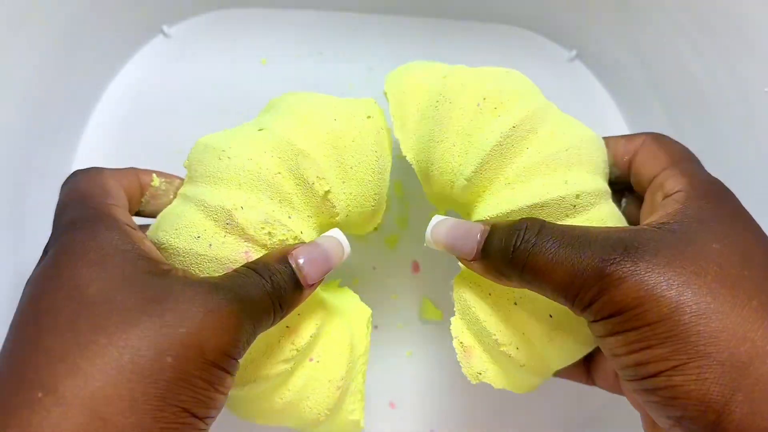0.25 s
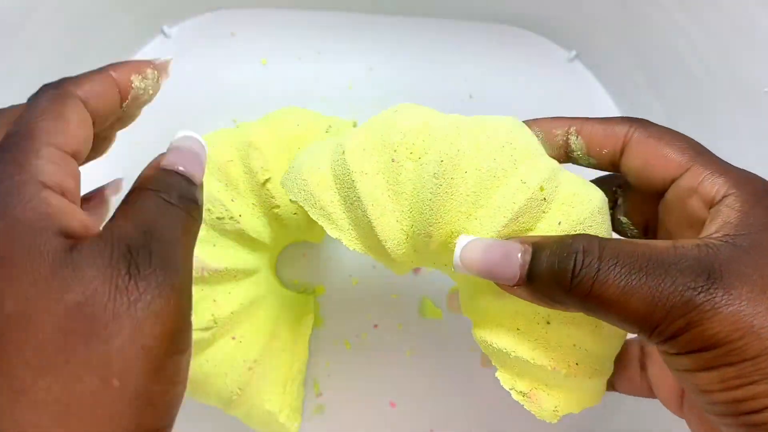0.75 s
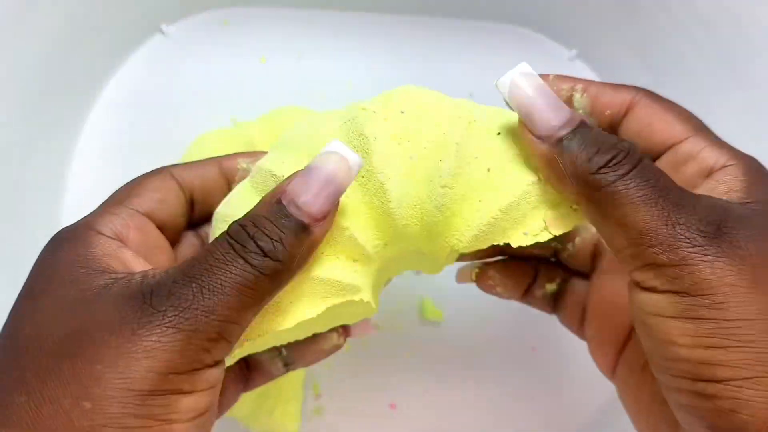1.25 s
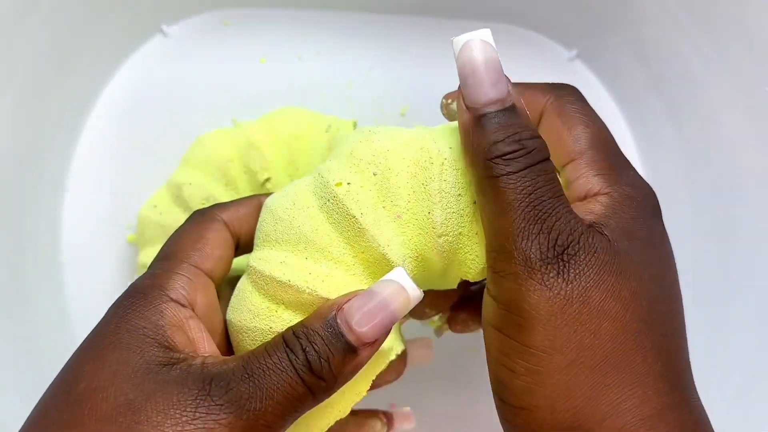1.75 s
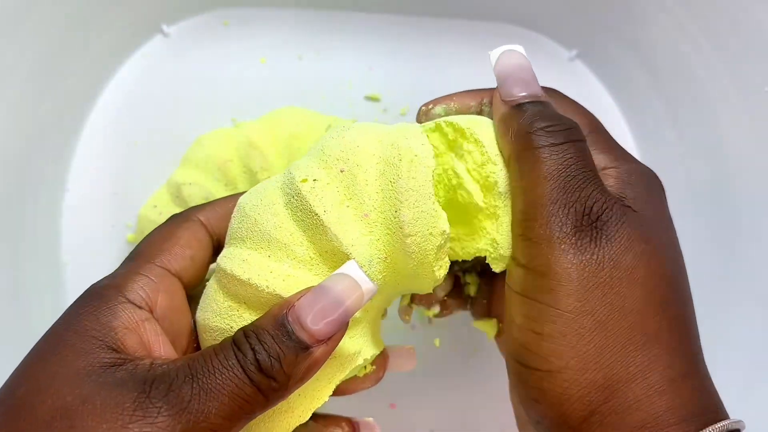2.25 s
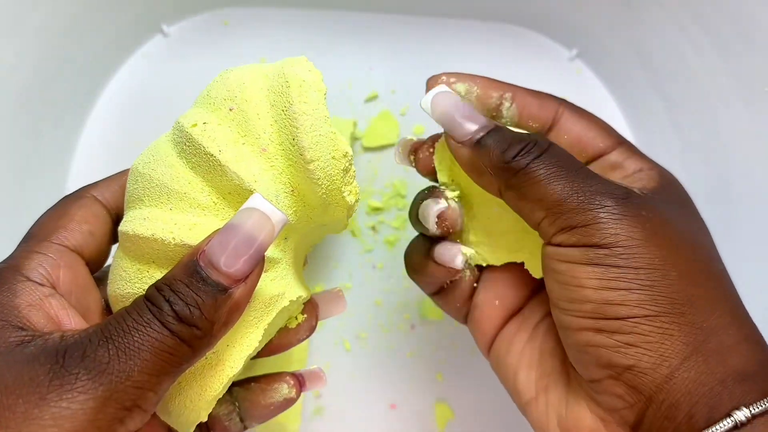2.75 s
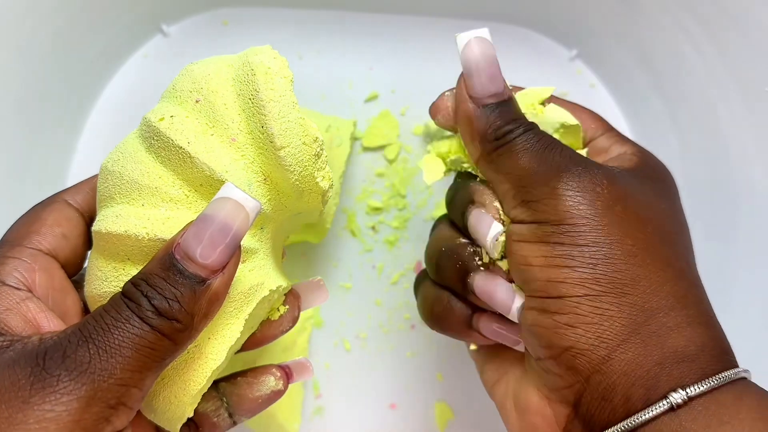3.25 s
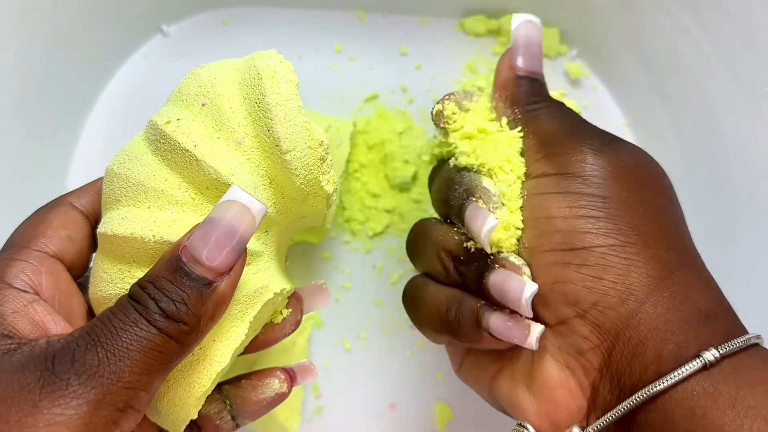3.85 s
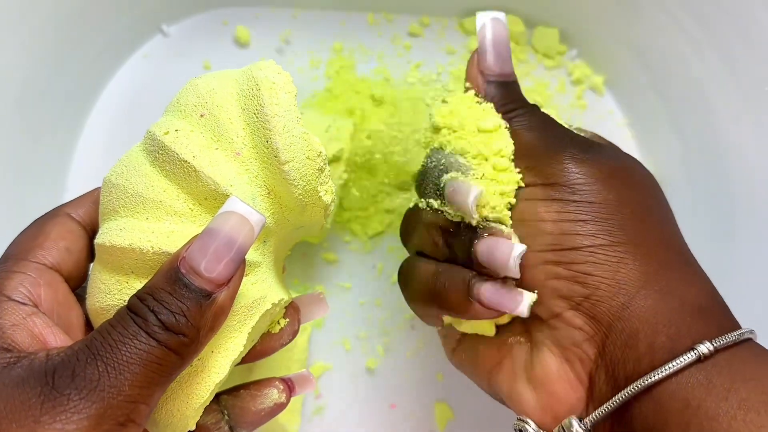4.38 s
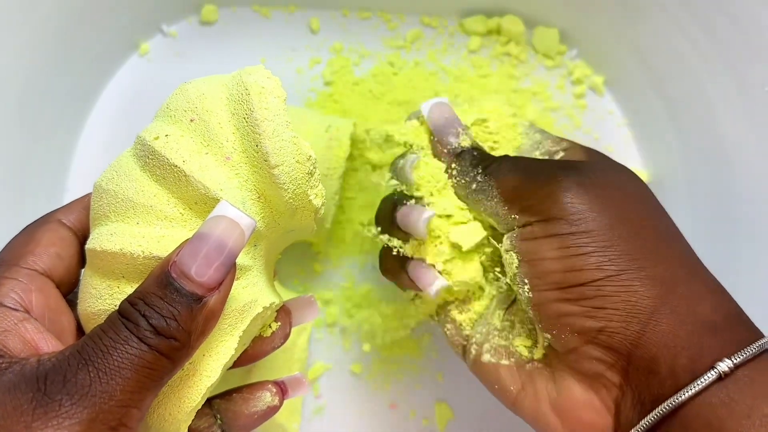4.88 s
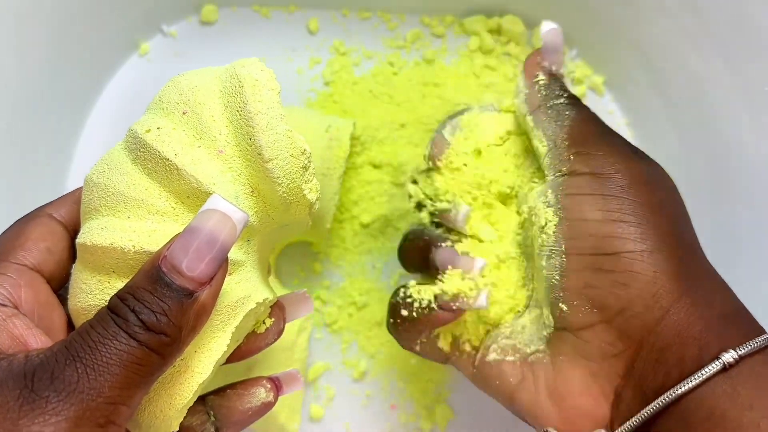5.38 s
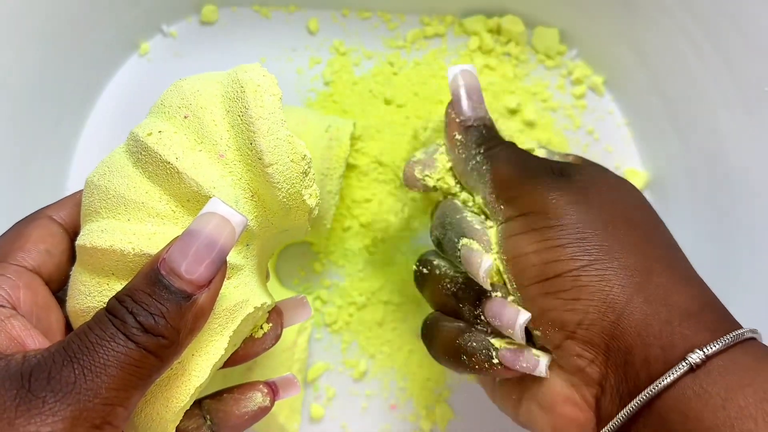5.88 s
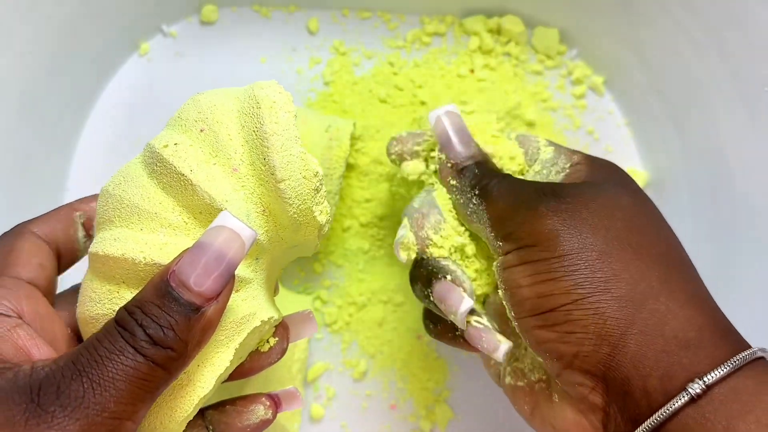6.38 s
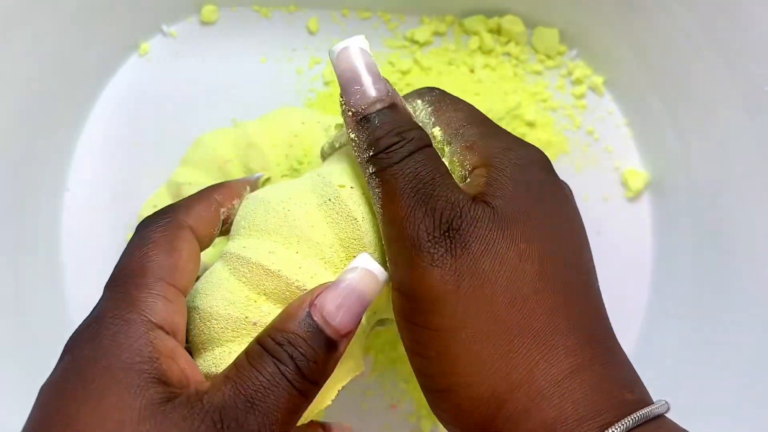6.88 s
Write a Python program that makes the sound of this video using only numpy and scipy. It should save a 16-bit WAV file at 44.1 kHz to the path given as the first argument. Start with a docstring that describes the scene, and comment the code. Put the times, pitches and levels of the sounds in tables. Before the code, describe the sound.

Close, crisp snaps and gritty crunching as a hand squeezes a chalk block to powder, crumbs sifting into a hollow plastic basin.

```python
"""A block of dry chalk is gripped, snapped and crushed by hand over a plastic basin, close under a small
microphone. Snaps and falling crumbs ring the hollow of the basin, skin hisses over the chalk, nails tick,
and knocks boom in the basin floor. Behind the hands the room rumbles. The recorder ducks after peaks
and clips the loudest."""
import sys
import numpy as np
from scipy import signal
from scipy.io import wavfile
from scipy.ndimage import uniform_filter1d

SR = 44100
rng = np.random.default_rng(int(sys.argv[2]) if len(sys.argv) > 2 else 0)


def put_to_file(sound):
    """Save the sound as 16-bit audio at rate SR, in the file named by the first command-line argument."""
    columns = np.atleast_2d(sound).T  # one column per channel
    safe = np.clip(columns, -1, 1)
    whole_steps = np.round(safe * 32767)
    wavfile.write(sys.argv[1], SR, whole_steps.astype(np.int16))


N = 314430


def gain_of(db):
    """Decibels to an amplitude factor."""
    return 10 ** (np.asarray(db) / 20)


def unit_rms(x):
    """Scales to rms 1."""
    return x / np.sqrt(np.mean(x ** 2) + 1e-20)


def at_hz(points, hz):
    """Reads a (frequency, value) table along a log frequency axis."""
    f, value = np.transpose(points)
    return np.interp(np.log(hz + 1), np.log(f + 1), value)


def level(rows, column=1):
    """One dB column of a time table as a gain, sample by sample."""
    rows = np.array(rows)
    return gain_of(np.interp(np.arange(N) / SR, rows[:, 0], rows[:, column]))


def resonances(rows):
    """A (frequency, dB) spectrum made of resonance peaks."""
    hz = np.geomspace(600, 12000, num=400)
    peaks = sum(gain_of(db) / (1 + ((hz - f) / (width / 2)) ** 2) for f, width, db in rows)
    return list(zip(hz, 20 * np.log10(peaks)))


def add(mix, start_s, sound):
    """Lays a sound into the mix at a time."""
    part = mix[..., max(round(start_s * SR), 0):][..., :sound.shape[-1]]
    part += sound[..., :part.shape[-1]]


def panned(sound, pan_db):
    """Leans a sound left or right."""
    return sound * gain_of([[pan_db / 2], [-pan_db / 2]])


# Left-right likeness of the noise; the opposed top treble is an audio coder effect:
# (frequency [Hz], left-right correlation)
STEREO_LIKENESS = [(60, 1), (300, 0.82), (700, -0.12), (2000, 1), (5000, 0.47), (8000, 1), (11000, -1.017),
                   (15000, -0.92)]


def noise(spectrum, size, patchy_db, flicker_db):
    """Stereo noise at rms 1, with drifting patches and a flicker shared by all bands."""
    hop = size // 2
    frames, hz = N // hop + 3, np.fft.rfftfreq(size, 1 / SR)
    a, b, c, d, patches = rng.standard_normal((frames, len(hz), 5), np.float32).T
    patches = unit_rms(uniform_filter1d(uniform_filter1d(patches, size=5, axis=0), size=6, axis=1))
    flicker = unit_rms(uniform_filter1d(rng.standard_normal(frames), size=2))
    width = np.sqrt((1 - np.clip(at_hz(STEREO_LIKENESS, hz), -1, 1)) / 2)[:, None]
    mid, side = np.sqrt(1 - width ** 2) * (a + 1j * b), width * (c + 1j * d)
    bands = np.array([mid + side, mid - side])
    bands *= gain_of(at_hz(spectrum, hz)[:, None] + patchy_db * patches + flicker_db * flicker)
    return unit_rms(signal.istft(bands, window="cosine", nperseg=size, noverlap=hop)[1][:, :N])


# The room behind the basin: (time [s], level [dB])
ROOM_LEVEL = [(0, -34), (.3, -22), (1.03, -24.5), (1.1, -36), (1.5, -23), (2.3, -29.5), (2.9, -25.5),
              (3.3, -33.5), (3.8, -26), (4.45, -28.5), (4.8, -33.5), (5.1, -24.5), (6, -22), (7, -22.5)]
# Its rumble: (frequency [Hz], relative level [dB])
ROOM_SPECTRUM = [(15, -43), (25, -22), (41, -1.5), (65, 3.5), (97, -2.5), (132, 3.5), (152, -17), (183, -7),
                 (274, -31.5), (650, -30), (1100, -120)]


def room_rumble():
    """Low room noise swells and sinks in the background."""
    return level(ROOM_LEVEL) * noise(ROOM_SPECTRUM, size=4096, patchy_db=1, flicker_db=0)


# Fingers sliding steadily, close under the microphone: (time [s], level [dB])
SLIDING = [(0.0, -33), (0.4, -23.5), (0.71, -35.5), (.84, -34), (1.45, -27), (1.7, -34.5), (1.93, -35),
           (2.22, -34.5), (2.28, -27), (2.38, -35.5), (2.47, -30.5), (2.9, -31.5), (3.45, -36.5),
           (4.0, -30.5), (4.1, -25), (4.25, -33.5), (4.4, -29.5), (4.87, -36.5), (5.12, -29.5), (6.23, -33),
           (6.51, -25), (6.76, -32), (7.13, -33.5)]
# Single strokes of a finger or of chalk on chalk: (start [s], end [s], hiss [dB], rasp [dB])
STROKES = [(0.144, 0.289, -24.5, -37.5), (0.3, 0.39, -20, -19.5), (0.446, 0.558, -21, -24.5),
           (0.865, 0.905, -23.5, -24.5), (0.87, 1.41, -46, -40), (1.154, 1.222, -64, -30.5),
           (1.381, 1.508, -16, -34), (1.516, 1.618, -17.5, -29), (2.57, 2.636, -26.5, -37),
           (6.535, 6.667, -36, -41), (6.803, 6.861, -28, -46)]
# (frequency [Hz], relative level [dB])
HISS_SPECTRUM = [(1500, -65), (2470, -11.5), (2930, -23.5), (3540, -12.5), (4150, -16.5), (5330, -12),
                 (7200, -8.5), (7700, -5.5), (8200, -9.5), (10200, -7), (11400, -10), (11800, -80),
                 (12300, -76), (15200, -3.5), (16300, -68)]
# Hollows between ridges: (frequency [Hz], width [Hz], relative level [dB])
RASP_PEAKS = [(2440, 110, -1), (3600, 130, -2), (1500, 2000, -18)]
# Singing of a hard stroke: (frequency [Hz], width [Hz], relative level [dB])
SCRAPE_PEAKS = [(5330, 200, 0), (5900, 250, -5), (6300, 250, -6), (6800, 400, -5)]


def rubbing():
    """Skin hisses over chalk; strokes rasp between the ridges, and hard ones sing."""
    hard_stroke_db = -22  # the singing dies away quickly below this hiss level
    scrape = noise(resonances(SCRAPE_PEAKS), size=1024, patchy_db=2.5, flicker_db=2)
    rasp = noise(resonances(RASP_PEAKS), size=1024, patchy_db=3.5, flicker_db=3)
    hiss = noise(HISS_SPECTRUM, size=512, patchy_db=3, flicker_db=2.5)
    drive = np.zeros((3, N))
    for start, end, hiss_db, rasp_db in STROKES:
        scrape_db = hiss_db - 2 - 3 * max(hard_stroke_db - hiss_db, 0)
        swell = signal.windows.tukey(round((end - start) * SR), .7)
        add(drive, start, gain_of([[hiss_db], [rasp_db], [scrape_db]]) * swell)
    return (level(SLIDING) + drive[0]) * hiss + drive[1] * rasp + drive[2] * scrape


LEAD_S = .005  # a faint swell, like pre-echo, leads into each crack
# Modes of the basin's hollow and the chalk lumps: (frequency [Hz], relative level [dB], t60 [s])
HOLLOW_MODES = [(800, -11, .03), (955, 0, .07), (1130, -11, .03), (1430, -6, .022), (1900, -9, .012),
                (2540, -7, .011), (3100, -9, .009), (3800, -12, .008)]


def hollow_ring(draw, centre_hz, t):
    """A break rings the hollow, tilted up if it is bright: it builds, rings briefly and is smothered."""
    hz, db, t60 = np.transpose(HOLLOW_MODES)[:, :, None]
    detune, phase, spread = draw.reshape(3, -1, 1)
    tilt_db = 12 * np.log2(centre_hz / 1000) * np.log2(hz / 950)
    dull_db = 10 * np.maximum(np.log2(hz / (1.5 * centre_hz)), 0)
    after = np.maximum(t - LEAD_S, 0)
    decay = gain_of(db + tilt_db - dull_db + 4.42 * spread - 60 * after / t60)
    modes = decay * np.sin(2 * np.pi * hz * (1 + .055 * detune) * t + 2 * phase)
    swell = .18 * np.exp(-np.maximum(LEAD_S - t, 0) / .002)
    attack = np.exp(-np.maximum(LEAD_S + .0005 - t, 0) / .0004)
    smother = .04 + np.exp(-(after / .0045) ** 3)
    ring = modes.sum(0) * np.maximum(swell, attack) * smother * np.minimum(t / .00033, 1)
    return ring / abs(ring).max()


# The crush, just above the basin: (time [s], crumbling level [dB], fist grit level [dB])
CRUSH = [(0, -37.5, -57), (.3, -54, -43), (.42, -36, -22), (.52, -24.5, -15.5), (.6, -25, -50),
         (.75, -30, -54), (1, -51.5, -48.5), (2.1, -38, -47.5), (2.45, -33.5, -33.5), (2.94, -43.5, -36),
         (3.3, -29, -36), (4.1, -28, -34), (4.96, -28, -33), (5.5, -32.5, -32), (6.05, -41.5, -39),
         (6.39, -43, -24), (6.6, -26.5, -50.5), (6.8, -40.5, -59), (7.13, -40, -37.5)]
# Sifting powder: (frequency [Hz], relative level [dB])
POWDER_SPECTRUM = [(400, -55), (600, -14), (950, -2.5), (1500, -8.5), (2200, -18.5), (4000, -51)]


def crumbling():
    """Small grains break, more of them the harder the fist squeezes, over sifting powder."""
    full_rate_per_s, full_grit_db, kinds = 500, -36, 10
    busy = np.clip(level(CRUSH, column=2) / gain_of(full_grit_db), .02, 1)
    sizes = gain_of(4.6 * np.minimum(rng.exponential(1, N), 4))
    breaks = sizes * (rng.random(N) < full_rate_per_s * busy / SR)
    kind = rng.integers(0, kinds, N)
    grains, t = np.zeros((2, N)), np.arange(1500) / SR
    for k, draw in enumerate(rng.standard_normal((kinds, 3 * len(HOLLOW_MODES) + 2))):
        ring = hollow_ring(draw[2:], 1150 * 2 ** (.65 * draw[0]), t)
        grains += panned(signal.oaconvolve(breaks * (kind == k), ring)[:N], pan_db=2.7 * draw[1])
    powder = noise(POWDER_SPECTRUM, size=512, patchy_db=2.5, flicker_db=3.5)
    return level(CRUSH) * (.85 * np.sqrt(busy) * unit_rms(grains) + (1 - .45 * busy) * powder)


# Hollows of the closed hand: (frequency [Hz], width [Hz], relative level [dB])
FIST_PEAKS = [(1590, 220, -3), (2200, 220, 0), (2720, 260, -3), (3400, 400, -7), (2300, 2500, -10)]


def fist_grit():
    """Grit crunches inside the fist, each grain giving way in a few milliseconds."""
    grains_per_s = 200
    grit = noise(resonances(FIST_PEAKS), size=1024, patchy_db=3.5, flicker_db=3.5)
    grains = rng.exponential(1, N) ** 2 * (rng.random(N) < grains_per_s / SR)
    crunch = unit_rms(signal.oaconvolve(grains, np.exp(-np.arange(400) / 70))[:N])
    return level(CRUSH, column=2) * grit * (.8 + .2 * crunch)


# The basin's hollow drone, heard from above: (frequency [Hz], relative level [dB])
DRONE_SPECTRUM = [(120, -8), (200, -3.5), (310, 0), (450, -4.5), (700, -5), (1200, -61)]


def basin_drone():
    """The basin drones as the crush shakes it, and puffs after each knock."""
    t = np.arange(SR) / SR
    shake = gain_of(-29) * (level(CRUSH) / gain_of(-27)) ** .85
    for start, db, _, t60 in KNOCKS:
        puff = gain_of(db - 13 - 60 * t / (t60 + .24))
        add(shake, start, puff * (1 - np.exp(-t / .000056)))
    return shake * noise(DRONE_SPECTRUM, size=1024, patchy_db=2.5, flicker_db=3.5)


# Nails and grit, close to the microphone: (time [s], level [dB])
TICKS = [(0.324, -4), (0.476, -6.5), (0.876, -13), (1.054, -10.5), (1.6273, -10.5), (2.0081, -3.5),
         (2.154, -13.5), (2.1886, -17), (2.319, -10.5), (2.396, -17), (2.5804, -10), (2.707, -8),
         (2.831, -18), (2.895, -9.5), (2.935, -14), (4.044, -12), (4.055, -11), (4.28, -8.5),
         (4.319, -11.5), (4.55, -12.5), (4.8205, -11), (4.85, -13.5), (5.432, -9.5), (6.543, -9),
         (6.8658, -10), (7.041, -5)]
# Bright noise of ticks and splinters: (frequency [Hz], relative level [dB])
TICK_SPECTRUM = [(1200, -13), (3000, -4), (8000, 1.5), (10500, -2), (12000, -12), (16000, -11)]
TICK_T60_S = .022


def ticks():
    """Nails and grit tick without ringing."""
    bursts, t = np.zeros(N), np.arange(2600) / SR
    attack = 1 - np.exp(-(t / .0004) ** 2)
    for start, db in TICKS:
        add(bursts, start, attack * gain_of(db - 60 * t / TICK_T60_S))
    return bursts * noise(TICK_SPECTRUM, size=256, patchy_db=1.5, flicker_db=0)


# Cracks in the chalk, over the basin: (time [s], relative level [dB], centre [Hz])
SNAPS = [(0.3272, -0.5, 1180), (0.3778, 1, 1130), (0.403, -3.5, 1460), (0.4725, -9.5, 1330),
         (0.4817, -1.5, 1310), (0.535, 2, 1100), (0.541, 0.5, 1010), (0.5807, -9, 1250), (0.592, -3.5, 845),
         (0.631, -14, 795), (2.012, -10, 1770), (2.1729, -3.5, 1640), (2.185, -6, 1480), (2.19, 5, 1300),
         (2.3213, -13.5, 1530), (2.3538, 1.5, 1010), (2.4095, -2.5, 1560), (2.462, -9.5, 1080),
         (2.4911, 1.5, 1950), (2.5055, -1.5, 1460), (2.7096, -8.5, 1310), (2.8927, -6, 1230),
         (2.933, -12.5, 1740), (3.05, -9, 2080), (3.103, 0.5, 1750), (3.143, -2.5, 1400), (3.21, 1, 1400),
         (3.2592, -7, 1920), (3.2906, -4.5, 850), (3.3403, 2.5, 980), (3.383, -4.5, 1110),
         (3.391, -2, 1600), (3.4734, -10, 1130), (3.49, -5.5, 1160), (3.517, 3.5, 1350),
         (3.5891, -2.5, 830), (3.5956, -5, 820), (3.6607, -9.5, 880), (3.681, -15, 900),
         (3.7221, -6.5, 950), (3.75, -5.5, 1070), (3.7843, -1.5, 1450), (3.807, -9, 1510),
         (3.814, -7.5, 1090), (3.87, -11, 1980), (3.9296, -10.5, 970), (3.965, 2, 1480), (3.969, -5, 1390),
         (4.048, -9, 1000), (4.062, -2, 950), (4.0705, -10, 1200), (4.0791, -8.5, 1100),
         (4.1073, -5.5, 1680), (4.152, -1, 1210), (4.167, -2.5, 1060), (4.2226, 1, 950), (4.2618, -6, 970),
         (4.2904, -8, 875), (4.31, -7.5, 950), (4.3378, -4, 1170), (4.343, -2, 1260), (4.3615, -3.5, 1550),
         (4.374, -15, 1000), (4.394, -7, 2580), (4.4108, -17, 1150), (4.462, -5.5, 1220),
         (4.49, -9.5, 1040), (4.517, -12, 950), (4.528, 1.5, 1440), (4.539, -5.5, 1440),
         (4.551, -6.5, 1830), (4.597, -17, 1010), (4.622, -27, 950), (4.66, -13.5, 1010), (4.6669, 2, 1010),
         (4.682, -20, 950), (4.7193, 1, 1180), (4.7885, -3, 1400), (4.8216, -6.5, 1350), (4.851, -13, 1080),
         (4.8809, -9, 1440), (4.902, -6, 1150), (4.976, -5.5, 1290), (5.0527, -1.5, 1080),
         (5.078, -9.5, 1110), (5.104, -10, 1130), (5.12, -8.5, 1740), (5.159, -3, 1090), (5.17, -5, 3200),
         (5.195, -13, 1030), (5.2866, -10.5, 1440), (5.3985, -4, 1100), (5.4114, -8, 1120),
         (5.432, -7.5, 1240), (5.475, -19, 2300), (5.503, -17, 1200), (5.726, -17.5, 1110),
         (5.747, -16.5, 2140), (5.931, -23, 2110), (6.1935, -6, 1740), (6.258, -17.5, 1100),
         (6.285, -18.5, 1710), (6.426, -14.5, 1480), (6.545, -13, 1480), (6.56, -4, 1040),
         (6.5678, -8, 1310), (6.5729, -6, 1020), (6.585, -2, 1090), (6.6486, -8, 1020), (6.9903, -16, 910),
         (7.0413, -10.5, 1580)]


def snaps():
    """Each crack runs in three steps, rings the hollow raggedly and throws a spray of splinters."""
    step_spread_s, flutter_depth = .011, .3
    rings, spray, t = np.zeros((2, N)), np.zeros(N), np.arange(2600) / SR
    draws = rng.standard_normal((len(SNAPS), 3 * len(HOLLOW_MODES) + 1))
    side_breaks = rng.random((len(SNAPS), 2, 2))  # two smaller breaks around each crack
    lowpass = signal.butter(4, 1500, fs=SR, output="sos")
    flutters = unit_rms(signal.sosfilt(lowpass, rng.standard_normal((len(SNAPS), len(t)))))
    for (start, db, centre_hz), draw, (place, size), flutter in zip(SNAPS, draws, side_breaks, flutters):
        ring = gain_of(min(db, 4) + 2) * hollow_ring(draw[1:], centre_hz, t)
        ring = panned(ring * (1 + flutter_depth * flutter), pan_db=2.5 * draw[0])
        spray_db = db - 19 + 5 * np.log2(centre_hz / 1000)  # bright cracks throw more splinters
        splinters = gain_of(spray_db - 60 * t / TICK_T60_S)
        for late_s, share in [(0, 1), *zip(step_spread_s * (place - .3), .25 * size)]:
            add(rings, start + late_s - LEAD_S, share * ring)
            add(spray, start + late_s, share * splinters)
    return rings + spray * noise(TICK_SPECTRUM, size=256, patchy_db=1.5, flicker_db=0)


# Lumps and knuckles meeting the basin: (time [s], relative level [dB], pitch [Hz], t60 [s])
KNOCKS = [(0.335, -17, 277, 0.1), (0.376, -12, 426, 0.06), (0.382, -6, 113, 0.17), (0.54, -10, 420, 0.09),
          (0.551, -11, 98, 0.12), (0.578, -15, 290, 0.12), (0.615, -16, 108, 0.25),
          (2.009, -5.5, 290, 0.028), (2.887, -16, 112, 0.041), (2.933, -16, 99, 0.07),
          (3.089, -14, 93, 0.027), (3.343, -18.5, 297, 0.14), (3.6, -19, 316, 0.14),
          (6.189, -8, 191, 0.014), (6.555, -13, 98, 0.031), (6.987, -12, 135, 0.03),
          (7.043, -5, 250, 0.024)]


def knocks():
    """Soft blows: a few low cycles that sag in pitch as the plastic settles."""
    blows, t = np.zeros(N), np.arange(9000) / SR
    attack = 1 - np.exp(-t / .00089)
    for start, db, hz, t60 in KNOCKS:
        is_slap = hz > 220 and t60 < .032  # short high knocks start far above their pitch
        sag_s = .005 if is_slap else .00064
        cycles = hz * (t + sag_s * (1 - np.exp(-t / .0034)))
        add(blows, start, attack * gain_of(db + 8 - 60 * t / t60) * np.sin(2 * np.pi * cycles))
    return blows


def echoes(blows):
    """Short dense echoes off the basin wall and the room, partly different on each side."""
    t, t60 = np.arange(9000) / SR, .085
    taps = rng.choice([-1., 1.], (2, len(t))) * (rng.random((2, len(t))) < .05)
    taps *= gain_of(-60 * t / t60) * (t > .002)
    taps = signal.sosfilt(signal.butter(2, 1800, fs=SR, output="sos"), taps)
    taps = taps + .8 * taps[::-1]  # each side also hears the other's echoes
    return signal.fftconvolve(blows, taps / np.linalg.norm(taps[0]), axes=1)[:, :N]


# The basin floor, below the hands: (frequency [Hz], relative level [dB])
FLOOR_SPECTRUM = [(30, -21), (64, -12), (95, 0), (125, 1.5), (150, -28), (250, -19), (420, -11), (700, -60)]


def floor_boom():
    """Deep knocks set the basin floor booming, far longer than the blow itself."""
    deep_hz, t60_stretch = 125, 5.7
    shudder, t = np.zeros(N), np.arange(SR) / SR
    attack = 1 - np.exp(-t / .03)
    for start, db, hz, t60 in KNOCKS:
        if hz < deep_hz:
            add(shudder, start, attack * gain_of(db - 11 - 60 * t / (t60_stretch * t60)))
    return shudder * noise(FLOOR_SPECTRUM, size=4096, patchy_db=5.5, flicker_db=-4.5)


def scene():
    """Hands, basin and room as they reach the microphone; snaps, ticks and knocks also echo."""
    blows = snaps() + ticks() + knocks()
    hands = blows + gain_of(-16) * echoes(blows) + crumbling() + rubbing() + fist_grit()
    return hands + room_rumble() + floor_boom() + basin_drone()


def record(dry):
    """The capsule drops the deepest bass; the recorder ducks after peaks, clips and limits the band."""
    threshold_db, duck_db_per_db, recovery_db_per_s = -6, .3, 60
    capsule = signal.sosfilt(signal.butter(2, 34, "high", fs=SR, output="sos"), dry)
    power_db = 10 * np.log10(abs(uniform_filter1d((capsule ** 2).mean(0), size=88)) + 1e-12)
    fall_db = np.arange(N) / SR * recovery_db_per_s  # of the held peak
    held_db = np.maximum.accumulate(power_db + fall_db) - fall_db
    over_db = uniform_filter1d(np.maximum(held_db - threshold_db, 0), size=88)
    ducked = np.clip(capsule / gain_of(duck_db_per_db * over_db), -.97, .97)
    band_limit = signal.firwin(511, 16200, window=("kaiser", 9), fs=SR)
    return np.clip(signal.oaconvolve(ducked, band_limit[None], "same"), -1, 1)


dry = scene()
out = record(dry)
put_to_file(out)
```